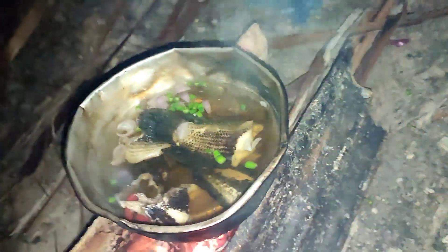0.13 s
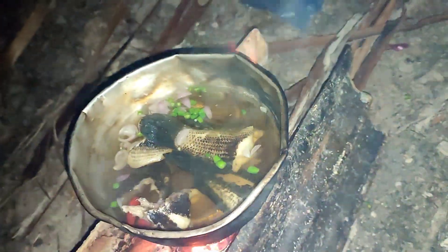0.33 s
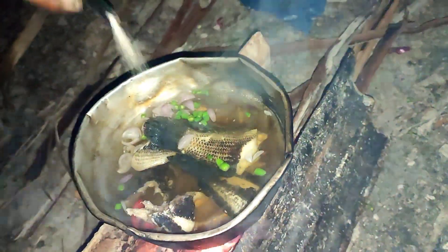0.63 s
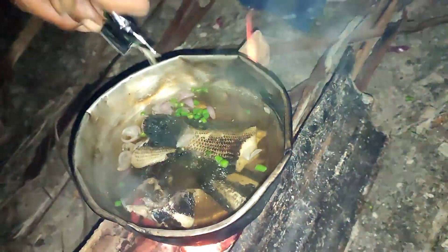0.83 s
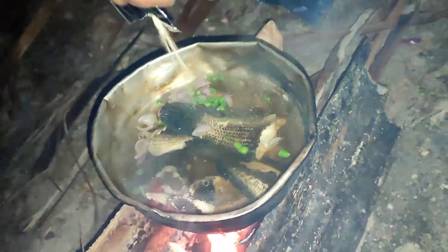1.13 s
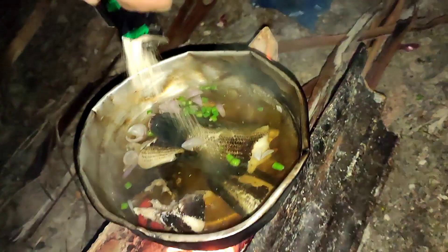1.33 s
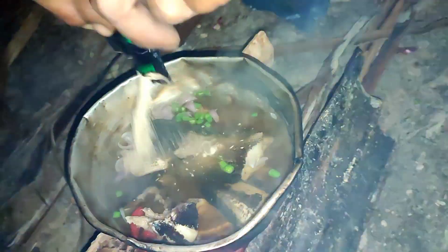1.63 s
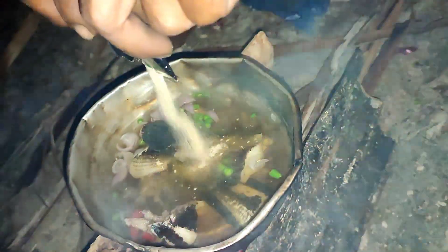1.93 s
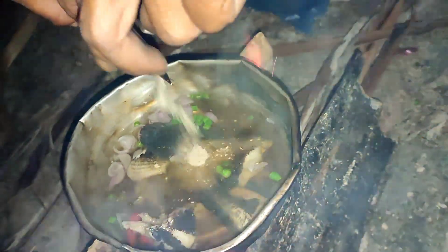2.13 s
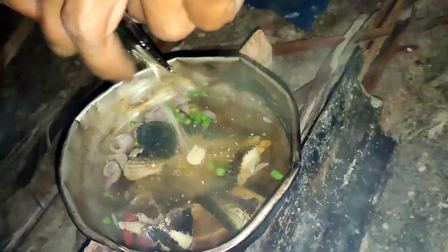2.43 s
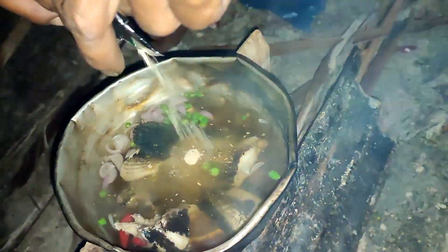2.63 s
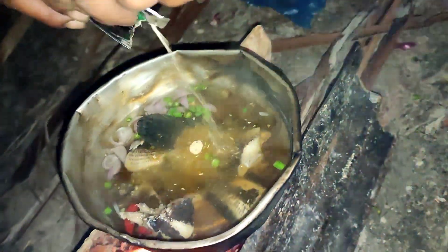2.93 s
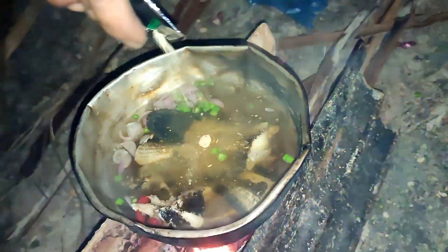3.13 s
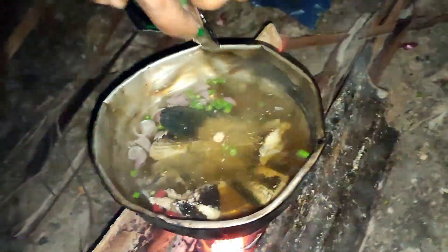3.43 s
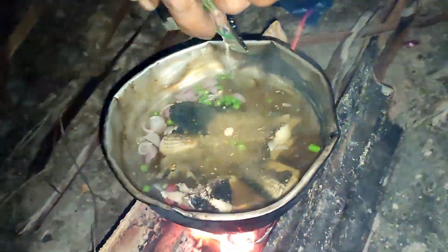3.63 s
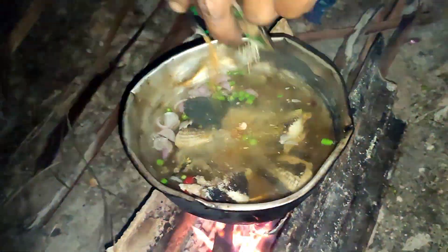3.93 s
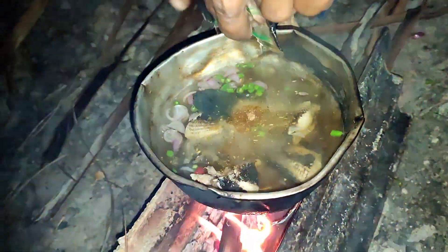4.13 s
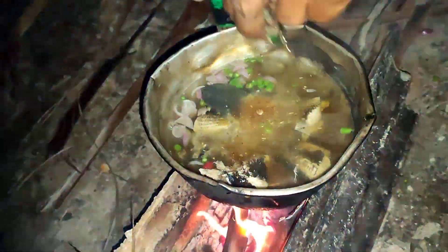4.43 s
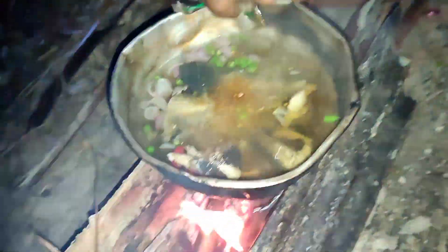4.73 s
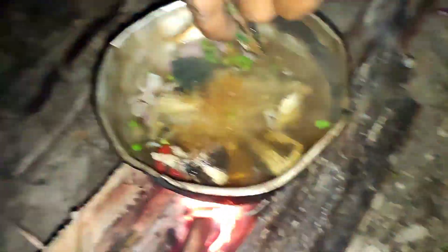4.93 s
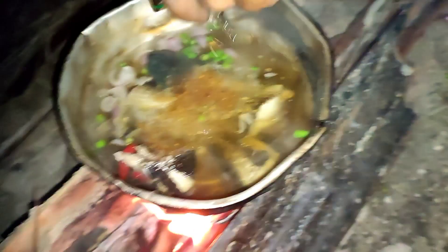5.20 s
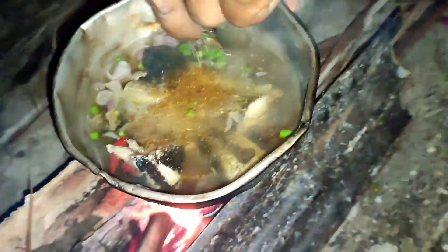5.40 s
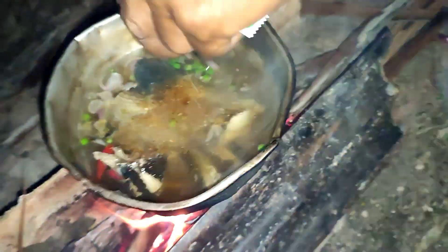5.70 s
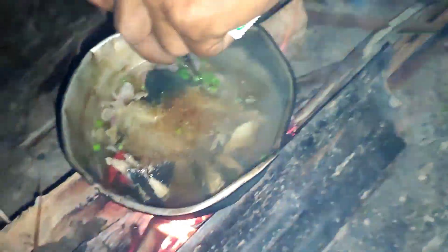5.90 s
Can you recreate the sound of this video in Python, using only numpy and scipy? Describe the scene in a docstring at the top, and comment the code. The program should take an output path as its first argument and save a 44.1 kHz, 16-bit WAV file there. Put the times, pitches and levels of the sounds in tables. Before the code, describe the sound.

Close by a night campfire, broth plops softly and wood pops while a foil packet crackles sparsely, then crumples brightly over the pot.

```python
"""Night in a forest: fish soup stands in a metal pot on a wood fire, heard from close by.
From the start the air flutters on the microphone, the fire hushes evenly and insects drone: all shaped noise.
Soft rustles, plops of the broth (rising sine pings), pops of the firewood (bursts through resonances) and
low handling bumps (single sine cycles) join in. From about 1.3 s a foil sachet ticks and snaps above the pot,
then is crumpled: clicks of random metallic colour grow into dense crackling that rings in the hollow pot."""
import sys
import numpy as np
from scipy import signal
from scipy.fft import rfft, irfft, next_fast_len
from scipy.io import wavfile
from scipy.ndimage import map_coordinates

SR = 44100
rng = np.random.default_rng(int(sys.argv[2]) if len(sys.argv) > 2 else 0)


def digitize_waveform(pressure):
    """Quantize a signal to 16-bit integers and store it at the path in sys.argv[1].

    Rows of a 2-D input are taken as channels; values are limited to [-1, 1].
    """
    field = np.atleast_2d(pressure).T
    bounded = np.clip(field, -1, 1)
    quanta = np.round(bounded * 32767).astype(np.int16)
    wavfile.write(sys.argv[1], SR, quanta)


N = 267246
TIME = np.arange(N) / SR  # s

# Squeezes of the sachet. Each row: start in seconds, rise in seconds, hold in seconds, level at full force in dB.
SQUEEZE_ROWS = [(1.482, 0.0063, 0.028, -52), (1.601, .008, 0.04, -59), (1.752, 0.014, 0.0071, -46.5),
                (3.342, 0.022, 0.0042, -48), (3.6, 0.08, 0.14, -61), (3.899, 0.019, 0.0066, -38),
                (4.02, 0.025, 0.034, -48.5), (4.5, 0.0033, 0.023, -40), (4.623, 0.0079, .026, -47.5),
                (4.67, 0.016, 0.016, -37), (4.739, 0.025, .034, -40), (4.874, 0.0033, .04, -48.5),
                (4.941, .012, 0.0042, -43.5), (5.131, 0.0045, .045, -48.5), (5.24, 0.0284, 0.009, -29.5),
                (5.328, 0.033, 0.049, -49), (5.419, 0.0081, 0.0067, -35), (5.496, 0.01, 0.02, -32),
                (5.535, 0.0052, .055, -46.5), (5.614, .046, 0.0092, -29), (5.766, 0.014, .02, -46.5),
                (5.987, 0.029, 0.023, -52.5)]
USUAL_DB = -44.5  # level of an ordinary squeeze


def amp(db):
    """Decibels to gain."""
    return 10 ** (np.asarray(db) / 20)


def unit(x):
    """Scale to rms 1."""
    return x / np.sqrt(np.mean(x ** 2) + 1e-20)


def sides(db):
    """Left and right gains for a level difference, left minus right in dB."""
    return unit(amp([[db / 2], [-db / 2]]))


def along(points, hz):
    """Read a curve of (Hz, value) points on a log frequency axis."""
    f, v = np.transpose(points)
    return np.interp(np.log(hz + 1), np.log(f + 1), v)


def curve(rows):
    """Draw (s, value) rows as one value per sample."""
    return np.interp(TIME, *np.transpose(rows))


def wobble(rate):
    """A smooth random curve, rate knots a second."""
    knots = rng.standard_normal(int(N * rate / SR) + 4)
    return map_coordinates(knots, [TIME * rate])


def filtered(x, response):
    """Filter x by a response given as a function of frequency."""
    n = x.shape[-1]
    m = next_fast_len(n + 4096)  # room for the filter's tail
    f = np.fft.rfftfreq(m, 1 / SR)
    return irfft(rfft(x, m) * response(f), m)[..., :n]


def causal(gain):
    """The minimum-phase response with this gain, scaled to unit power: nothing sounds ahead of the click."""
    cepstrum = irfft(np.log(np.maximum(unit(gain), 1e-6)))
    half = len(cepstrum) // 2
    folded = np.r_[cepstrum[0], 2 * cepstrum[1:half], np.zeros(half)]
    return np.exp(rfft(folded))


def body(modes, f):
    """Response of a set of resonances (Hz, width Hz, dB) with alternating signs, scaled to unit power."""
    h = 0
    for k, (centre, width, db) in enumerate(modes):
        resonance = 1j * f * width / (centre * centre - f * f + 1j * f * width)
        h = h + (-1) ** k * amp(db) * resonance
    return h / np.sqrt(np.mean(abs(h) ** 2))


def noise(gain, size=N):
    """Stereo noise of rms 1, coloured by a gain of frequency."""
    return unit(filtered(rng.standard_normal((2, size)), gain))


def band(hz, width, size=N):
    """Narrow stereo noise around one pitch; width in Hz at half power."""
    return noise(lambda f: np.exp(-2 * np.log(2) * ((f - hz) / width) ** 2), size)


def add(track, s, sound):
    """Mix a sound into the track at time s."""
    part = track[:, max(round(s * SR), 0):][:, :sound.shape[-1]]
    part += sound[..., :part.shape[-1]]


def crack(t60, scatter_db, scatter_t60):
    """A sharp noise burst and its longer, weaker scatter off nearby things; decays in s per 60 dB."""
    t = np.arange(4096) / SR
    shape = amp(-60 * t / t60) + amp(scatter_db - 60 * t / scatter_t60)
    return shape * rng.standard_normal((2, len(t)))


def as_blow(x):
    """Scale a short sound so that its energy equals 4 ms at rms 1."""
    return x * np.sqrt(2 * .004 * SR / np.sum(x ** 2))


def facet(f, uneven_db):
    """Random resonances of one facet or ember, a few hundred Hz apart; they fade out towards the bass."""
    knots = np.arange(0, 17000, 350)  # Hz
    depth_db = uneven_db * np.minimum(f / 1500, 1)
    heights = rng.standard_normal(len(knots)).clip(-1.7, 1.7)
    return amp(depth_db * np.interp(f, knots, heights))


def draught():
    """Air flutters on the microphone in bell-shaped gusts, with low handling bumps; mostly on the left."""
    # Gusts of air. Each row: peak in seconds, length in seconds, level in dB.
    gust_rows = [(.01, 0.052, -45), (0.317, 0.18, -50.5), (.63, 0.13, -56), (1.17, 0.23, -50),
                 (1.64, 0.27, -54.5), (2.435, 0.19, -44.5), (2.825, 0.12, -51.5), (2.985, 0.24, -48.5),
                 (3.585, 0.25, -55), (4.341, 0.1, -49), (4.514, 0.076, -42), (4.755, 0.2, -49.5),
                 (4.943, 0.14, -46), (5.086, 0.066, -45), (5.24, 0.18, -53.5), (5.68, 0.055, -51),
                 (5.949, 0.22, -45.5)]
    # Low bumps of handling, one soft thump each. Each row: middle in seconds, level in dB, pitch in Hz.
    bump_rows = [(1.155, -43, 89), (1.603, -49.5, 98), (2.483, -35.5, 84.4), (4.528, -38.5, 85),
                 (4.577, -43.5, 100), (4.948, -40.5, 67.4), (5.975, -40.5, 96)]
    # Colour of the flutter. Each row: frequency in Hz, density in dB per Hz (relative).
    rumble_colour = [(12, -13.5), (20, 8.5), (67, -3), (85, -9.5), (167, -21), (260, -26.5), (340, -48),
                     (570, -120)]
    calm_db, calm_wander_db = -62, 4.5  # the air between gusts
    gust_power = 0
    for s, length, db in gust_rows:
        gust_power = gust_power + amp(db) ** 2 * np.exp(-2 * (2 * (TIME - s) / length) ** 2)
    calm = amp(calm_db + calm_wander_db * wobble(10))
    flow = np.sqrt(calm ** 2 + gust_power)
    lows = flow * noise(lambda f: amp(along(rumble_colour, f)))
    for s, db, hz in bump_rows:
        cycles = (TIME - s) * hz
        lows += amp(db) * np.sin(2 * np.pi * cycles) * np.exp(-2 * cycles ** 2)
    return sides(13.2) * lows


def hush():
    """The even rush of fire and forest: a middle and a side noise, the side weaker in the bass."""
    # Colour of the hush. Each row: frequency in Hz, density in dB per Hz (relative).
    hush_colour = [(30, 20), (200, 5), (330, 1), (620, -0.5), (1100, -7), (2200, -6), (4200, -5.5),
                   (6000, -9.5), (10300, -12), (12500, -8), (14200, -13), (14600, -16)]
    middle, side = noise(lambda f: amp(along(hush_colour, f)))
    side = filtered(side, lambda f: amp(along([(300, -5), (1200, 1)], f)))
    level = amp(-65.0 + 2.1 * wobble(4.54))
    return level * np.array([middle + side, middle - side])


def call(start, length):
    """Envelope of an insect's call: it fades in, holds and fades out."""
    fade_s = 0.13
    return np.clip(np.minimum(TIME - start, start + length - TIME) / fade_s, 0, 1)


def insects():
    """Narrow noise bands: trilling choruses that slowly swell, with chirps and buzzes of nearer insects."""
    # Each row: pitch in Hz, width in Hz, level in dB, mean pulses a second, left minus right in dB.
    chorus_rows = [(2790, 240, -85, 10, -8), (3415, 320, -74.5, 21, -1.5), (5310, 340, -76, 56, -1),
                   (6730, 320, -72.5, 23, -0.5), (7150, 39, -73.5, 60, -18), (7600, 1800, -68, 108, 2.5),
                   (8300, 1370, -70, 80, 10), (9180, 790, -76, 83, -5)]
    # Steady chirpers. Each row: pitch in Hz, width in Hz, level in dB, first call, period, call length in seconds.
    chirper_rows = [(2830, 210, -70, 0.74, 1.003, 0.37), (6680, 180, -73, 0.36, 1.23, .76)]
    # Long buzzes of a nearer insect. Each row: start in seconds, pitch in Hz, level in dB.
    buzz_rows = [(-0.8, 3530, -83), (1.4, 3723, -71.5), (6, 3560, -65), (5.55, 3610, -66.5)]
    buzz_s, buzz_width_hz, waver_db = 1.58, 73, 1.5
    out = np.zeros((2, N))
    for hz, width, db, rate, pan_db in chorus_rows:
        trill = 1 + 0.28 * np.sin(2 * np.pi * rate * TIME + 2 * wobble(5.7))
        out += amp(db + 0.37 * wobble(2.9)) * sides(pan_db) * trill * band(hz, width)
    waver = amp(waver_db * wobble(14))
    for hz, width, db, first, period, length in chirper_rows:
        calls = sum(call(s, length) for s in np.arange(first, N / SR, period))
        out += amp(db) * calls * band(hz, width)
    for start, hz, db in buzz_rows:
        out += amp(db) * waver * call(start, buzz_s) * band(hz, buzz_width_hz)
    return out


def rustles():
    """Brief swells of soft noise through one wide resonance, made grainy by a fast random level."""
    # Each row: middle in seconds, length in seconds, level in dB, pitch in Hz.
    rustle_rows = [(0.139, 0.064, -62.5, 2080), (0.468, 0.21, -70, 530), (1.007, 0.15, -64, 504),
                   (3.023, 0.079, -65.5, 624), (3.262, 0.061, -65, 4100), (3.339, 0.023, -58.5, 880),
                   (4.997, 0.028, -60.5, 898)]
    out = np.zeros((2, N))
    for s, length, db, hz in rustle_rows:
        swell = np.exp(-(2 * (TIME - s) / length) ** 2) * amp(3.1 * wobble(250))
        out += amp(db) * swell * noise(lambda f: body([(hz, 0.42 * hz, 0)], f))
    return out


def broth(t60, rise):
    """The soup simmers: each bubble rings for a few cycles, rising in pitch as it opens."""
    # Loudest bubbles bursting. Each row: start in seconds, level in dB, starting pitch in Hz.
    plop_rows = [(.447, -53.5, 650), (1.338, -48, 413), (2.959, -49.5, 1170), (3.025, -63, 600),
                 (3.317, -49, 258), (3.318, -49.5, 570), (3.456, -57.5, 490), (4.274, -58, 904),
                 (4.712, -43.5, 620), (4.713, -42.5, 940)]
    out = np.zeros((2, N))
    t = np.arange(SR // 10) / SR
    # small bubbles at random moments
    simmer = [(when * N / SR, -67 + 9 * size, 330 * 5 ** pitch) for when, size, pitch in rng.random((45, 3))]
    for s, db, hz in list(plop_rows) + simmer:
        envelope = amp(db - 60 * t / t60) * (1 - np.exp(-t / 0.00011))
        add(out, s, envelope * np.sin(2 * np.pi * hz * t * (1 + rise * t)))
    return out * sides(-5.2)


def firewood(count, right_lead):
    """Steam pockets burst in the logs: dull knocks, right side first by right_lead s, and faint ember ticks."""
    # Pops. Each row: start in seconds, level over 4 ms in dB.
    pop_rows = [(0.9321, -28.5), (0.9497, -43.5), (1.079, -46), (1.1, -51.5), (2.2399, -56), (2.482, -63),
                (3.914, -42.5)]
    # Resonances of the wood. Each row: frequency in Hz, width in Hz, level in dB.
    wood_modes = [(273, 48, -2), (471, 39, 0), (636, 56, 2.5), (1030, 190, 2.5), (1480, 156, -1.5),
                  (2000, 200, -2), (2550, 69, -15.5), (3400, 190, -9), (6230, 630, -34)]
    out = np.zeros((2, N))
    lag_s = np.array([[right_lead], [0]])
    for s, db in pop_rows:
        burst = crack(t60=.014, scatter_db=-20, scatter_t60=.05)
        burst[:, 30] += 14  # one sharp impulse inside the burst
        knock = filtered(burst, lambda f: body(wood_modes, f) * np.exp(-2j * np.pi * f * lag_s))
        add(out, s, amp(db) * sides(-1.3) * as_blow(knock))
    for when, size, side in rng.random((count, 3)):
        burst = crack(t60=.005, scatter_db=-12, scatter_t60=.025)
        tick = filtered(burst, lambda f: causal(facet(f, uneven_db=5) / (1 + f / 2500)))
        add(out, when * N / SR, amp(-67 + 9 * size ** 2) * sides(6 * (side - .5)) * as_blow(tick))
    return out


def foil_colour(f, treble_db, uneven_db):
    """Colour of one foil sound: small stiff creases sound brighter than wide soft ones."""
    # Colour of the foil. Each row: frequency in Hz, density in dB per Hz (relative).
    foil_curve = [(150, -6), (300, -12), (550, -9.5), (1000, -6.5), (1500, -7), (2200, -7), (3500, -0.5),
                  (4300, -1), (6000, -2.5), (7600, 3), (9000, -0.5), (10300, -5), (12000, -3),
                  (14200, -3.5)]
    tilt = [(700, -.3 * treble_db), (3000, -.5 * treble_db), (10000, .5 * treble_db)]
    return causal(amp(along(foil_curve, f) + along(tilt, f)) * facet(f, uneven_db))


def squeeze_treble(db):
    """Treble over mids in dB: the harder the foil is pressed, the brighter it sounds."""
    return -4 + 0.31 * (db - USUAL_DB)


def stray_creases(count):
    """The sachet ticks faintly at random moments; rows as in the table of snaps."""
    from_s, level_db, treble_db = 1.3, -55, -16
    when, size, side = rng.random((count, 3)).T
    times = from_s + when * (N / SR - from_s)
    return [(s, level_db + 5 * (z - .5), treble_db, 8 * (p - .5)) for s, z, p in zip(times, size, side)]


def small_creases(count):
    """Lesser creases give way at uneven intervals through each squeeze; rows as in the table of snaps."""
    gap_s, settle_s = .022, .004  # mean spacing; how long they go on after the fingers let go
    crease_db, grows, spread_db = -46.5, 0.53, 3.5  # usual level, dB per dB of force, scatter
    rows = []
    for start, rise, hold, db in SQUEEZE_ROWS:
        times = start + gap_s * (np.arange(count) + rng.random(count))
        level_db = crease_db + grows * (db - USUAL_DB)
        for s, (size, colour, side) in zip(times, rng.standard_normal((count, 3)).clip(-2, 2)):
            if s < start + rise + hold + settle_s:
                rows.append((s, level_db + spread_db * size, squeeze_treble(db) + 5 * colour, 1 + 4 * side))
    return rows


def snaps(rows, creak_db, creak_rise_db, t60, scatter_db, uneven_db):
    """A crease creaks for an instant, then flips over with a sharp click."""
    out = np.zeros((2, N))
    lead = SR // 200  # the creak lasts 5 ms
    for s, db, treble_db, pan_db in rows:
        creak = amp(creak_db + np.linspace(-creak_rise_db, 0, lead)) * rng.standard_normal((2, lead))
        click = crack(t60, scatter_db, scatter_t60=.021)
        # the direct wavefront is alike on both sides
        click[:, 24] += rng.choice([-1, 1]) * 3.5
        snap = filtered(np.hstack([creak, click]), lambda f: foil_colour(f, treble_db, uneven_db))
        add(out, s - lead / SR, amp(db) * sides(pan_db) * as_blow(snap))
    return out


def crumpling(rate, spread_db, rub, count, uneven_db):
    """A squeeze buckles several facets at once; the harder it is, the denser the tiny clicks."""
    usual_swell_db, swell_grows = 16, 0.47  # build-up of an ordinary squeeze; extra dB per dB of force
    sag_db, release_db_per_s = 0.5, 917  # it eases while held, then lets go
    catch_db, catches_per_s = 3, 109.6  # the foil catches and slips under the fingers
    out = np.zeros((2, N))
    t = np.arange(SR // 3) / SR
    for start, rise, hold, db in SQUEEZE_ROWS:
        density = rate * amp(.7 * (db - USUAL_DB))  # clicks a second over all facets
        stream = 0
        for _ in range(count):
            hits = rng.random(len(t)) < density / count / SR
            buckles = hits * amp(spread_db * np.minimum(rng.exponential(size=len(t)), 2))
            # foil rubs on foil between the clicks
            buckles = buckles + rub * rng.standard_normal(len(t))
            click = crack(t60=.002, scatter_db=-18, scatter_t60=.012)
            grains = signal.fftconvolve(buckles[None], click, axes=1)[:, :len(t)]
            stream = stream + filtered(grains, lambda f: foil_colour(f, squeeze_treble(db), uneven_db))
        swell_db = usual_swell_db + swell_grows * (db - USUAL_DB)
        force_db = np.interp(t, [0, rise, rise + hold], [-swell_db, 0, -sag_db])
        force_db = force_db - release_db_per_s * np.maximum(t - rise - hold, 0)
        grip = rng.standard_normal(len(t)).clip(-2, 2)
        catching = amp(catch_db * map_coordinates(grip, [t * catches_per_s], order=1))
        add(out, start, amp(db + force_db) * unit(catching * stream))
    return out * sides(0.84)


def sachet():
    """The foil is heard directly and through the hollow of the pot, which lies to the right."""
    # Loudest creases buckling. Each row: click in seconds, level over 4 ms in dB, treble over mids in dB,
    # left minus right in dB.
    snap_rows = [(1.34, -49, -20, -1), (1.3618, -40, -7.5, 4), (1.4569, -47, -11, 5), (1.4878, -46, -12, 5),
                 (1.501, -42, -26, -3), (1.531, -47, -9, -2), (1.612, -42.5, -17, -0.5),
                 (1.628, -43.5, -16, 7), (1.65, -40.5, -1, 4), (1.6559, -41, -1, 4),
                 (1.767, -46.5, -28, 11), (1.9113, -45, -10.5, -1.5), (2.1802, -45, -8, 5),
                 (2.2418, -38, -1, 2.5), (2.4053, -32, 9.5, 0.5), (2.4838, -40, -13.5, 2),
                 (2.8167, -48.5, -13, 6), (2.912, -41, -7, 1), (3.03, -50, -14, 1), (3.368, -34, -3, 5),
                 (3.3967, -45, -9, -3), (3.6657, -44.5, -18, 2.5), (3.7065, -44.5, 1, 4),
                 (3.7262, -46.5, -11, -1), (3.7662, -43.5, -13, 8), (3.7963, -45.5, -8, 1),
                 (3.8234, -39, -1, 3.5), (3.956, -40, -0.5, -1), (4.045, -38.5, 1, 0),
                 (4.178, -48, -5.5, 0), (4.416, -51.5, -10, 6), (4.5033, -45.5, -16, -10),
                 (4.5133, -39.5, -4, -7), (4.5522, -41.5, -11, -3), (4.615, -26.5, 9.5, 2),
                 (4.6817, -27.5, 1, 1), (4.793, -35, -4.5, 1), (4.8268, -40.5, 2, 0),
                 (4.8748, -35.5, 3, -0.5), (4.9226, -43, 9, -1), (5.1369, -42.5, -18, 4),
                 (5.1429, -37, 1.5, 2), (5.2006, -39.5, 0, 0), (5.218, -42.5, -4, -2),
                 (5.2382, -39.5, 1, 6), (5.2714, -26.5, 6.5, 5), (5.3315, -40.5, 3.5, 2),
                 (5.358, -39.5, 7, 3), (5.403, -29, 12.5, 4), (5.4286, -25.5, 1, -30), (5.4818, -43, 3, 1),
                 (5.504, -35.5, 1, 7), (5.5519, -33.5, 5, 7), (5.6063, -38, 9, -7), (5.6165, -31, 5, 8),
                 (5.6707, -27, -7, -6), (5.7513, -41.5, -5.5, 1), (5.7873, -42, 0, -1),
                 (5.9076, -47, 7, -1), (6.0297, -40.5, 4, 0)]
    # Hollow of the pot under the hand. Each row: frequency in Hz, width in Hz, level in dB.
    pot_modes = [(690, 58, -9), (1150, 113, -7.5), (1426, 106, -11), (1650, 75, 1.5), (2270, 70, -7)]
    # How strongly the pot answers as the hand moves over it. Each row: time in seconds, level in dB.
    over_pot = [(0, -21.5), (4.9, -18.5), (5.3, -12), (5.65, -11)]
    uneven_db = 3.5  # unevenness of a facet's resonances
    foil = crumpling(rate=480, spread_db=3, rub=0.038, count=4, uneven_db=uneven_db)
    creases = list(snap_rows) + stray_creases(count=22) + small_creases(count=12)
    foil += snaps(creases, creak_db=-4, creak_rise_db=16, t60=0.0057, scatter_db=-2.5, uneven_db=uneven_db)
    in_pot = filtered(foil * amp(curve(over_pot)), lambda f: body(pot_modes, f))
    return foil + sides(-7.5) * in_pot


def clearing(x, t60):
    """A short answer from the ground and the trees: x convolved with decaying noise."""
    t = np.arange(SR // 3) / SR
    tail = rng.standard_normal((2, len(t))) * amp(-60 * t / t60) * (1 - np.exp(-t / 0.00077))
    return signal.fftconvolve(x, tail / np.linalg.norm(tail[0]), axes=1)[:, :N]


def scene():
    """Close sounds at the pot, with their faint echo, over the night's background."""
    night = draught() + hush() + insects()
    near = rustles() + broth(t60=0.032, rise=6.4) + firewood(count=36, right_lead=.00045) + sachet()
    return near + amp(-15.0) * clearing(near, t60=0.13) + night


def record(dry):
    """The treble falls away steeply towards a band limit, above which nothing is left."""
    top_hz = 16400
    roll_off = [(14200, 1.0), (14800, -22.0), (16400, -38)]  # (Hz, dB)
    return filtered(dry, lambda f: amp(along(roll_off, f)) * (f < top_hz))


dry = scene()
out = record(dry)
digitize_waveform(out)
```